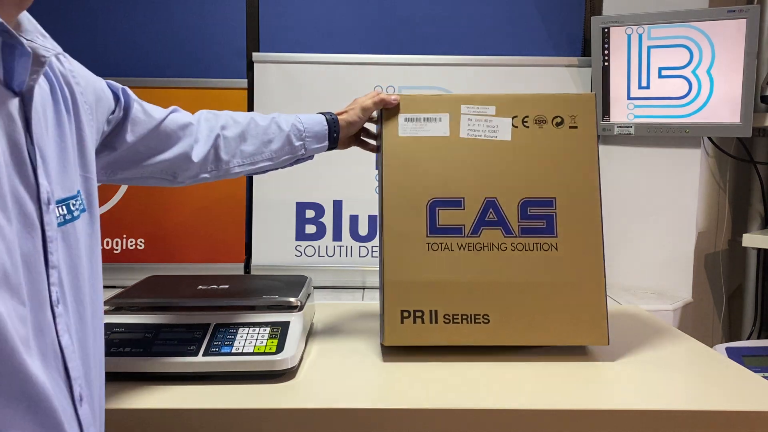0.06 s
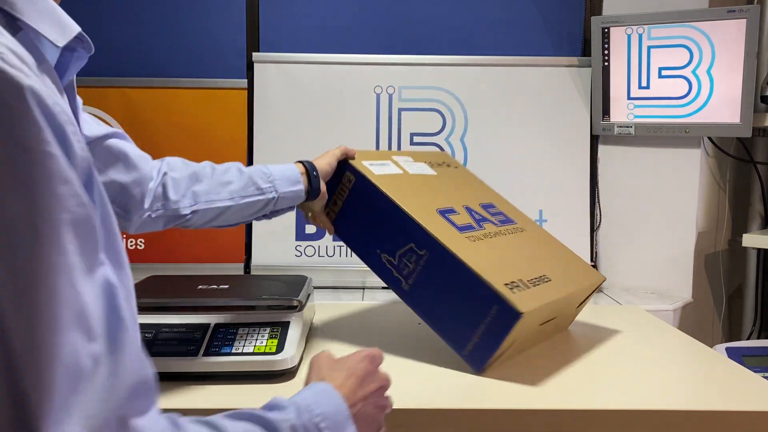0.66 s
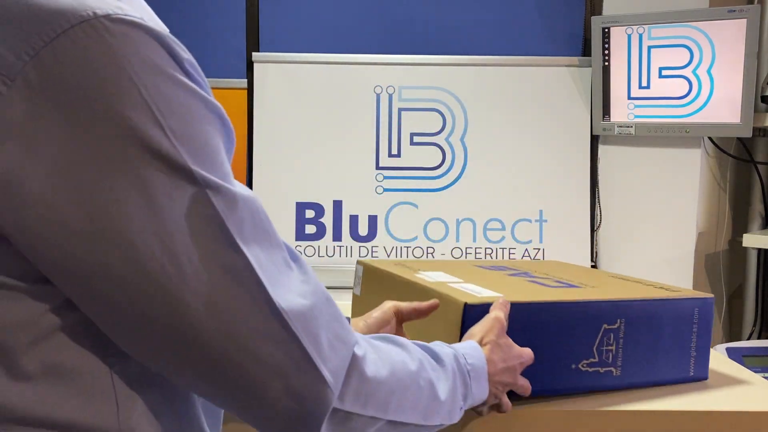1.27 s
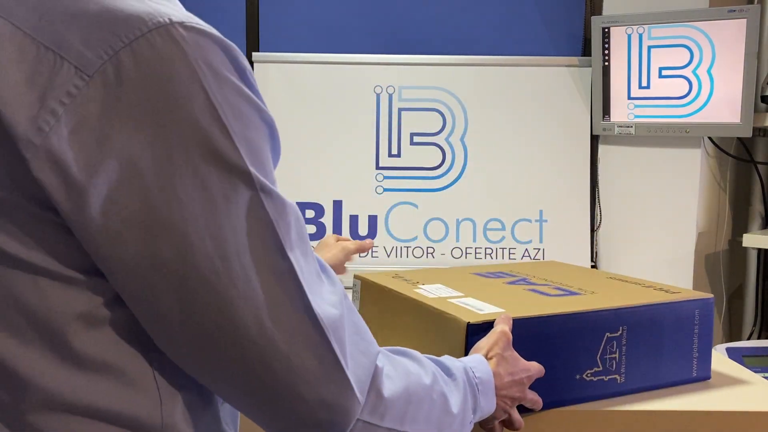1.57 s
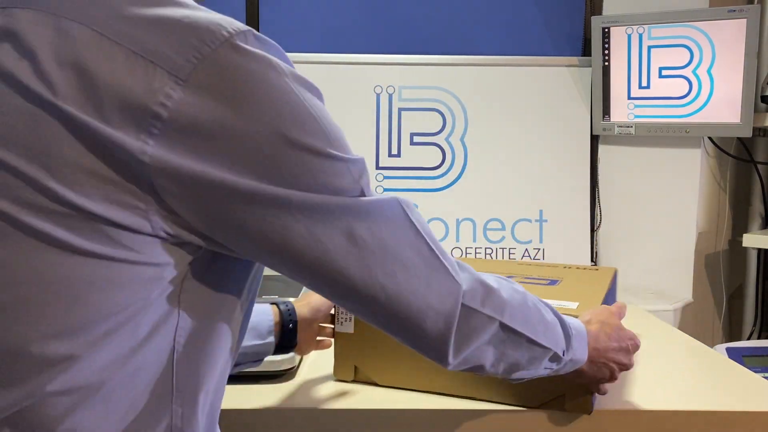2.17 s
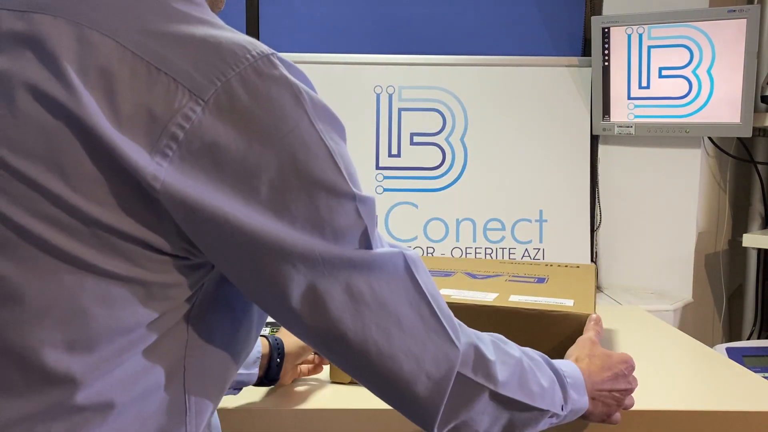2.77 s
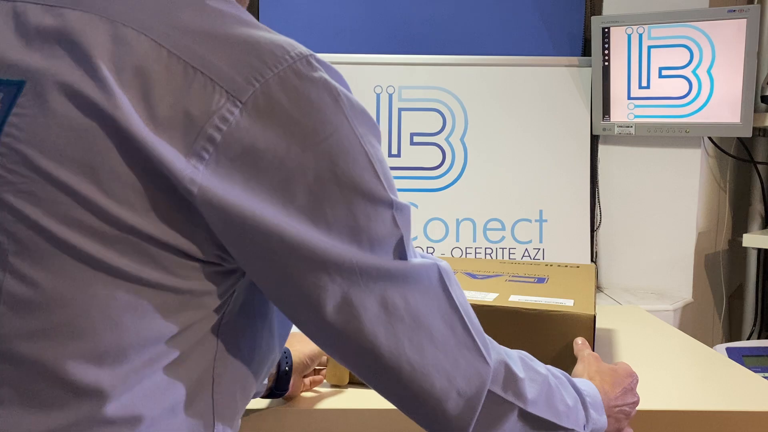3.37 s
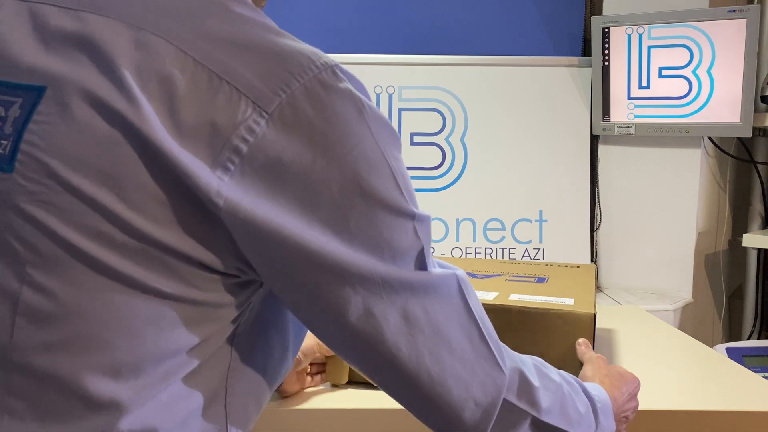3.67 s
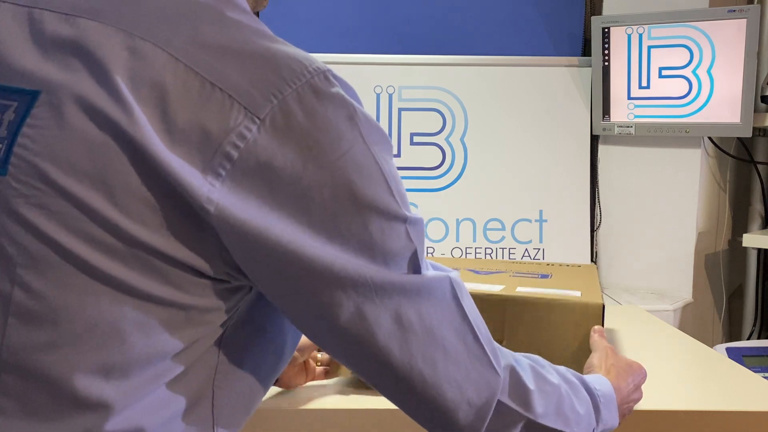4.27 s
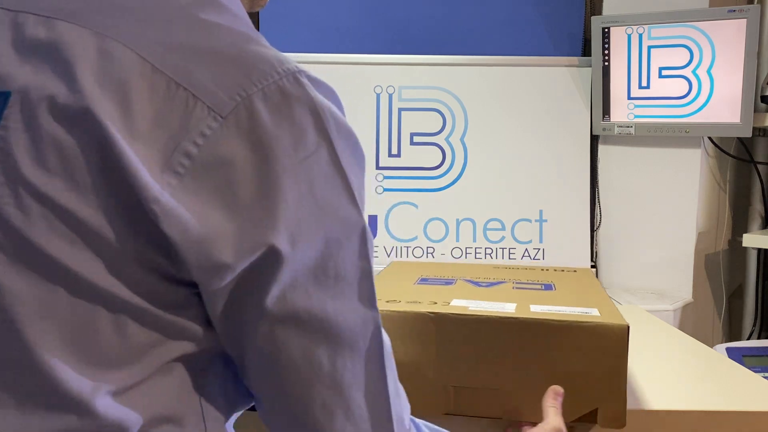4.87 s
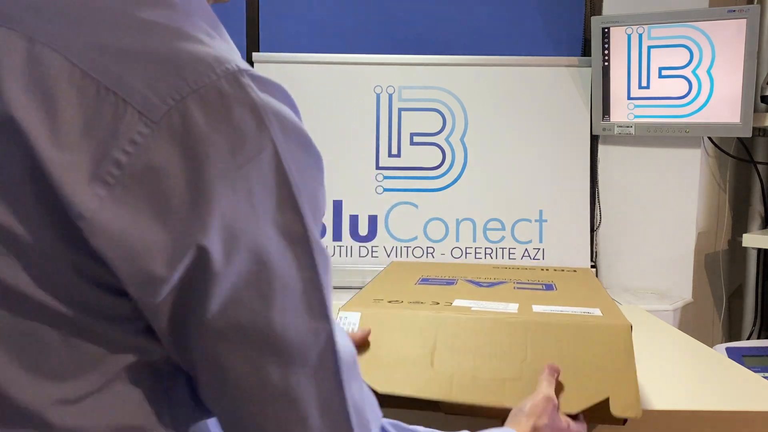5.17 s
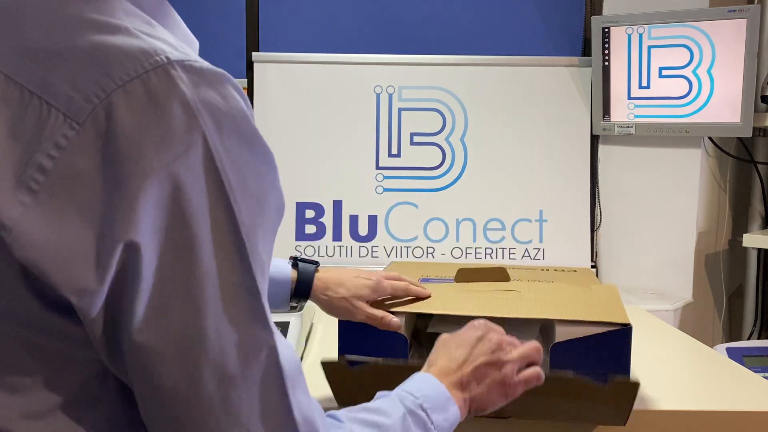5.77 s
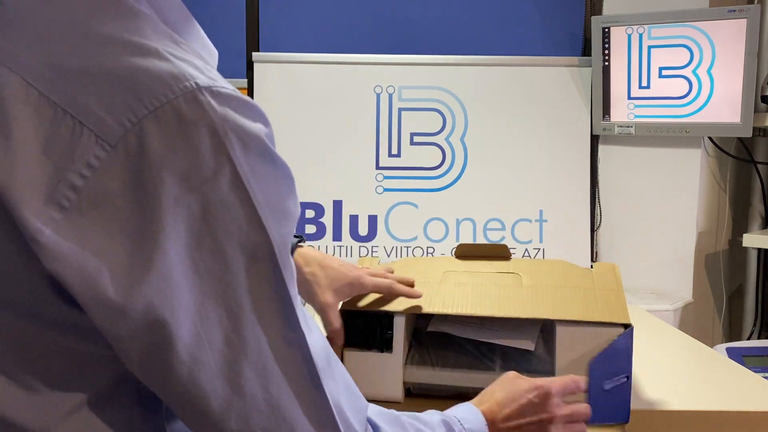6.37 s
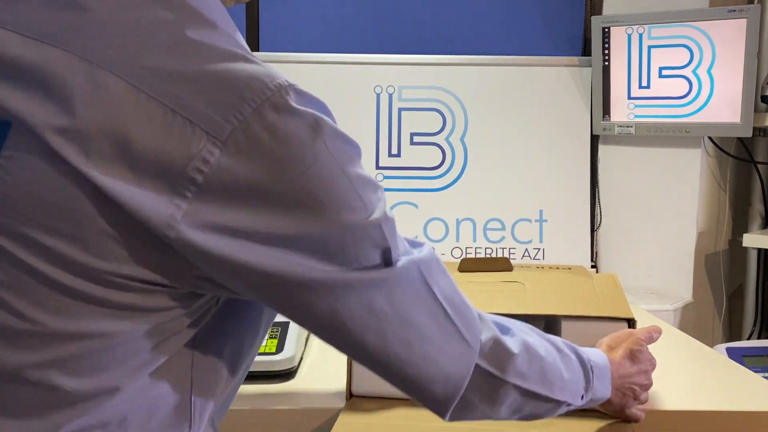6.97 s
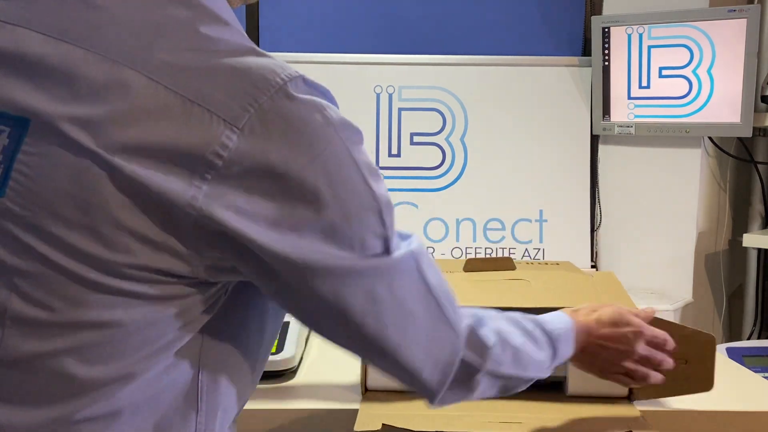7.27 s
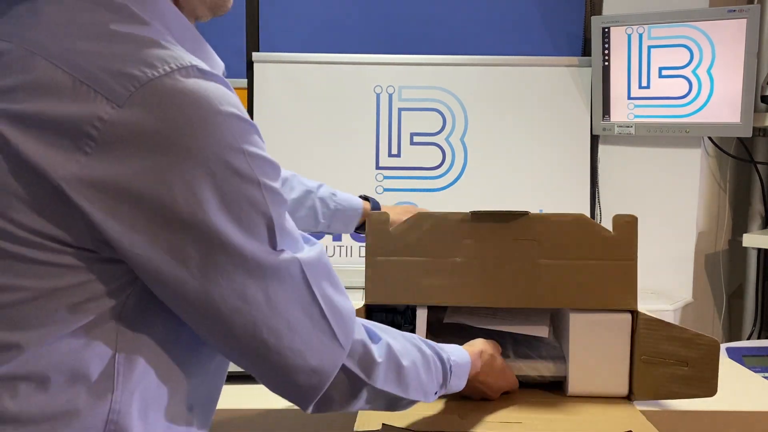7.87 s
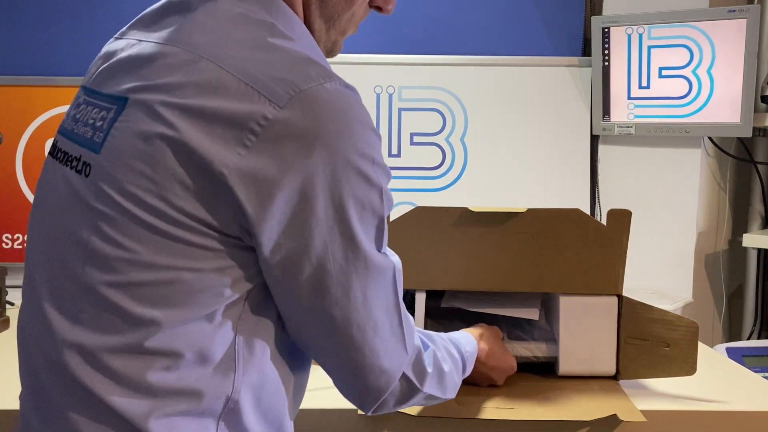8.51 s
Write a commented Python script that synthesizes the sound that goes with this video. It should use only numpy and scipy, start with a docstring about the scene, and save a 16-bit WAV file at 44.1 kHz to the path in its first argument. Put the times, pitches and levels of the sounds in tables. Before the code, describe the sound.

A cardboard box is set down, turned and opened, with hollow thumps, rubbing, crackles and two sharp pops, close by in a small room.

```python
"""A cardboard box is tipped onto a desk, turned and opened, close by in a small office.
Each bump thumps the hollow box, rings its panels and makes the room boom; the flapping lid pushes air.
Card rubs and crackles, two locking tabs scrape and pop free, and a hand reaches into the packing.
Shirt sleeves swish as the arms move, over a faint rumble of ventilation."""
import sys
import numpy as np
from scipy import signal
from scipy.fft import rfft, irfft, next_fast_len
from scipy.io import wavfile
from scipy.ndimage import uniform_filter1d, map_coordinates

SR = 44100
rng = np.random.default_rng(int(sys.argv[2]) if len(sys.argv) > 2 else 0)


def wrap_up_sound(samples):
    """Save the sound to the file named by the first command line argument, as 16-bit audio."""
    columns = np.atleast_2d(samples).T
    # keep every value between -1 and 1, then stretch to whole-number steps
    tamed = np.clip(columns, -1, 1)
    steps = np.round(tamed * 32767).astype(np.int16)
    wavfile.write(sys.argv[1], SR, steps)


N = 376613
TIME = np.arange(N) / SR
AGE = np.arange(SR // 2) / SR  # seconds since a hit, up to half a second

# Tone of the ventilation: (frequency [Hz], level [dB])
VENT_TONE = [(20, 12), (45, 11), (170, -0.5), (330, -0.5), (600, -26), (1150, -17), (1450, -22.5),
             (1800, -23), (5000, -30.5), (16000, -22.5)]
# Arm movements that swish a sleeve: (fastest moment [s], level [dB], rise [s], fall [s])
SLEEVE_STROKES = [(0.29, -44, 0.13, 0.29), (0.68, -47, 0.23, 0.42), (1.33, -61.5, 0.09, 0.57),
                  (2.12, -43, 0.33, 0.38), (3.4, -64.5, 0.24, 0.5), (4.15, -66.5, 0.36, 0.19),
                  (4.45, -59.5, 0.19, 0.065), (4.87, -51, 0.62, 0.19), (5.42, -44.5, 0.28, 0.22),
                  (6.45, -58, 1, 0.71), (7.15, -44, 0.25, 0.17), (7.49, -59, 0.095, .06),
                  (7.65, -49.5, 0.13, 0.15), (7.96, -51, 0.14, 0.18), (8.32, -44.5, 0.28, 0.33)]
# Tone of sliding cloth: (frequency [Hz], level [dB])
SLEEVE_TONE = [(40, -18), (170, 2.5), (450, 2.5), (1200, 0), (2500, -0.5), (5500, -4.5), (8000, -2),
               (11500, -2), (16000, -4.5)]
# Card sliding on the desk or under a hand: (fastest moment [s], level [dB], rise [s], fall [s])
RUB_STROKES = [(0.2, -58, 0.22, 0.43), (0.72, -44.5, 0.4, 0.31), (1.1, -52.5, 0.21, .3),
               (1.87, -47, 0.2, 0.27), (2.85, -56.5, 0.53, 0.21), (3.37, -53, 0.11, 0.15),
               (3.97, -50.5, 0.79, 0.5), (4.76, -45.5, .45, 0.28), (5.42, -48, 0.53, 0.61),
               (6.12, -53.5, 0.33, 0.7), (7.06, -46.5, 0.35, 0.34), (7.68, -49, 0.14, 0.17),
               (8.2, -50.5, 0.13, 0.16), (8.54, -45.5, .16, .15)]
# Tone of rubbing card: (frequency [Hz], level [dB])
RUB_TONE = [(30, -13.5), (70, -2), (165, 3.5), (260, -1), (430, 1.5), (700, -2), (1050, -3.5), (1700, -7.5),
            (4000, -15), (16000, -28)]
# Edges and packing scraping: (start [s], end [s], level [dB], swell [dB], tone centre [Hz])
EDGE_SCRAPES = [(0.12, 0.29, -55.5, 4, 3550), (0.588, 0.856, -50.5, -5, 990),
                (2.649, 2.669, -49.5, 6, 2230), (3.27, 3.343, -42.5, -14.5, 2780),
                (3.592, 3.69, -51.5, -5, 1900), (3.742, 3.784, -28.5, 36.5, 1900),
                (4.13, 4.234, -54, -6.5, 1400), (4.55, 4.599, -50, -12, 655),
                (4.678, 4.993, -54, -19, 2140), (5.083, 5.122, -32.5, 23, 1500),
                (5.108, 5.136, -32.5, -9.5, 4540), (5.25, 5.31, -40, -5, 1060),
                (5.743, 5.81, -46.5, -5, 2600), (6.029, 6.159, -52, 12, 1300),
                (7.581, 7.725, -49, -13.5, 5060), (7.874, 8.037, -59, -13, 6020)]
# Creases giving way: (time [s], level [dB], tone centre [Hz], length of the crackle after it [s])
CREASE_SNAPS = [(0.165, -51, 9070, 0), (0.854, -49, 6930, .02), (1.033, -58, 2960, 0),
                (1.158, -56.5, 7000, 0), (1.393, -39, 6000, 0), (2.376, -55, 7100, 0),
                (2.648, -60, 5040, 0), (2.677, -48, 3580, 0), (2.8, -57.5, 3020, .04),
                (3.125, -42.5, 5050, 0), (3.274, -45.5, 3200, .08), (3.598, -43.5, 3300, .03),
                (3.636, -44.5, 3340, .02), (4.521, -50.5, 10900, 0), (5.115, -38.5, 4500, 0),
                (5.287, -39, 7040, .05), (5.605, -53, 2050, 0), (6.808, -53, 6000, .02),
                (7.085, -51.5, 5040, 0), (7.580, -46.5, 5300, .15), (7.767, -52.5, 6970, .13),
                (7.946, -48, 5940, .03), (8.015, -48.5, 5520, .02), (8.412, -48.5, 7040, 0),
                (8.478, -43.5, 5000, .06)]
# Bumps on the box: (time [s], thump level [dB], panel level [dB], panel pitch [Hz], treble limit [Hz])
BOX_BUMPS = [(1.394, -28, -32, 840, 900), (1.709, -57, -52.5, 397, 586), (2.374, -44.5, -45, 630, 1820),
             (2.566, -52, -64, 397, 500), (2.82, -52.5, -52, 880, 1500), (3.127, -45.5, -40.5, 1570, 2970),
             (3.297, -46, -40.5, 980, 1470), (3.635, -46.5, -40.5, 510, 1210),
             (3.781, -24.5, -24.5, 485, 2290), (4.39, -41.5, -43.5, 413, 1310),
             (4.422, -40, -43.5, 473, 1510), (4.659, -45, -42.5, 990, 1400), (5.116, -19.5, -27, 780, 1600),
             (5.333, -34.5, -41, 426, 800), (5.438, -47, -47, 487, 1090), (5.520, -29.5, -31.5, 437, 920),
             (5.763, -43, -39.5, 560, 1400), (6.107, -36.5, -44, 1000, 900), (6.247, -41, -50, 400, 487),
             (6.484, -50, -51, 430, 710), (7.93, -48, -50, 420, 400)]
# Low notes of a thump, the hollow box's short ones and the room's long boom:
# (pitch [Hz], level [dB], ring time to fade by 60 dB [s])
BOX_AND_ROOM_NOTES = [(65.5, -19, 1), (85.8, -16.5, 0.44), (111.6, -10, 0.48), (151, 1.5, 0.13),
                      (171, -1, 0.21), (165.6, -19, 0.66), (208, -0.5, 0.14), (291.4, -5.5, 0.18)]
# Notes of the box's panels: (pitch [Hz], level [dB], ring time [s])
PANEL_NOTES = [(390, 3, 0.08), (433.2, -2, 0.16), (491, -8, 0.057), (535, -2, 0.066), (655, -9.5, 0.12),
               (743, 1, 0.1), (811, 1, 0.071), (939, 4.5, 0.055), (1090, 1, 0.018), (1240, 8.5, 0.017),
               (1583, -11.5, 0.097), (2036, -31, 0.031), (2560, 5.5, 0.035)]
# Tone of the sharp crack in a bump: (frequency [Hz], level [dB])
CRACK_TONE = [(200, -17), (900, -2), (2800, -3), (4000, -12.5), (7500, -10.5), (11000, -12), (16000, -14)]
# Brief pitched rings of card (tab pops, a squeak, ringing snaps and hollow bumps):
# (time [s], level [dB], pitch [Hz], ring time [s])
CARD_PINGS = [(1.394, -28, 905, 0.072), (2.188, -20, 2040, 0.0072), (2.677, -25, 3480, 0.0029),
              (3.779, 4, 1270, 0.0035), (3.7812, -11.5, 486, 0.024), (5.117, -9, 1210, 0.0055),
              (5.606, -27, 2360, 0.0036), (7.937, -43.5, 438, 0.06)]
# Broad panels and flaps pushing air: (time [s], level [dB])
FLAP_WAFTS = [(1.398, -37), (4.449, -35.5), (5.123, -41), (5.335, -31.5), (5.37, -35.5)]
# Notes of the bending flaps: (pitch [Hz], level [dB], ring time [s])
FLAP_NOTES = [(67.5, 3, 0.21), (84.2, -2, 0.24), (109.6, -7, 0.11)]
# How long the office rings: (frequency [Hz], ring time [s])
ROOM_RING = [(60, 1), (200, 0.35), (600, 0.27), (2500, 0.43), (7000, 0.42), (16000, 0.23)]
# Strength of the room's echoes: (frequency [Hz], level [dB])
ECHO_TONE = [(60, -14.5), (200, -5), (450, 1), (900, -2), (16000, -1)]
# Stereo width of the echoes; "side" is how the two channels differ: (frequency [Hz], side level [dB])
ECHO_WIDTH = [(60, -9), (250, -7.5), (600, -2.5), (1500, -1.5), (5800, -3.5), (7000, -15.5), (16000, -17)]
# Stereo width of rustle and ventilation: (frequency [Hz], side level [dB])
RUSTLE_WIDTH = [(60, -15.5), (250, -13), (700, -6), (1500, -4.5), (3000, -9.5), (5800, -2), (7000, -49),
                (16000, -17.5)]
# Left microphone turned up and right one down by this much: (frequency [Hz], level [dB])
LEFT_LEAN = [(60, 0), (700, 0), (2000, 0.3), (5000, 1.5), (7000, -0.5)]


def amp(db):
    """Turn decibels into a multiplier."""
    return 10 ** (np.asarray(db) / 20)


def unit(x):
    """Scale to an average (rms) level of 1."""
    return x / np.sqrt(np.mean(x ** 2) + 1e-20)


def burst(x):
    """Give a hit the energy of 40 ms of sound at level 1."""
    return x * np.sqrt(.04 * SR / np.sum(x ** 2))


def along(points, hz):
    """Read between a table's rows, on a log frequency scale."""
    freqs, values = np.transpose(points)
    return np.interp(np.log(hz + 1), np.log(freqs + 1), values)


def filtered(x, response):
    """Multiply each frequency in x by response(hz)."""
    size = x.shape[-1]
    padded = next_fast_len(size + 8192)
    return irfft(rfft(x, padded) * response(np.fft.rfftfreq(padded, 1 / SR)), padded)[..., :size]


def noise(tone, size):
    """Noise shaped by a tone table, at level 1."""
    return unit(filtered(rng.standard_normal(size), lambda hz: amp(along(tone, hz))))


def resonate(x, centre_hz, damping):
    """Keep a band around centre_hz; more damping makes it wider."""
    width_hz = damping * centre_hz
    return filtered(x, lambda hz: 1j * hz * width_hz / (centre_hz ** 2 - hz ** 2 + 1j * hz * width_hz))


def dull(x, cut_hz):
    """Soft card passes little above cut_hz."""
    return filtered(x, lambda hz: 1 / (1 + 1j * np.sqrt(2) * hz / cut_hz - (hz / cut_hz) ** 2))


def wobble(rate):
    """A smooth curve through rate random points a second."""
    return map_coordinates(rng.standard_normal(int(N * rate / SR) + 4), [TIME * rate])


def add(track, s, sound):
    """Mix a sound into the track, s seconds in."""
    part = track[round(s * SR):][:len(sound)]
    part += sound[:len(part)]


def spread(mid, side):
    """Blend two unrelated sounds into one wide stereo sound."""
    side = filtered(side, lambda hz: amp(along(RUSTLE_WIDTH, hz)))
    return np.array([mid + side, mid - side])


def ventilation():
    """Ventilation fills the office with a faint, steady rumble and hiss."""
    return amp(-62.0) * spread(noise(VENT_TONE, N), noise(VENT_TONE, N))


def strokes(rows, edge_db=19, flatness=2.13):
    """Loudness of strokes: each gains edge_db over its rise and loses it again over its fall."""
    power = np.zeros(N)
    for s, db, rise_s, fall_s in rows:
        away = np.abs(TIME - s) / np.where(TIME < s, rise_s, fall_s)
        near = away < 2
        power[near] += amp(db - edge_db * away[near] ** flatness) ** 2
    return np.sqrt(power)


def shifting(x, depth_db):
    """Touching spots and echoes move, so the tone keeps changing."""
    bands = signal.stft(x, nperseg=1024)[2]
    drift = uniform_filter1d(rng.standard_normal(bands.shape), size=7, axis=0)  # smooth over frequency
    drift = uniform_filter1d(drift, size=9, axis=1)  # and over time
    return unit(signal.istft(bands * amp(depth_db * unit(drift)), nperseg=1024)[1][:N])


def sleeves():
    """Cloth slides in a fine, fluttering hiss with each arm movement."""
    weave = amp(0.99 * wobble(45) + 0.82 * wobble(700))
    cloth = [shifting(noise(SLEEVE_TONE, N) * weave, depth_db=1.94) for _ in range(2)]
    return spread(*cloth) * strokes(SLEEVE_STROKES) * amp(2.5)


def slips(size, rate, spread_db):
    """Card sticks and slips, making about rate tiny, uneven clicks a second."""
    chance, strength = rng.random(size), rng.standard_normal(size)
    return (chance < rate / SR) * rng.choice([-1, 1], size) * amp(spread_db * np.clip(strength, -2, 2))


def rubbing():
    """Sliding card makes a low, grainy rub as its fibres catch under changing pressure."""
    pressure = amp(1.2 * wobble(25))
    fibres = []
    for _ in range(2):
        grain = filtered(slips(N, rate=3500, spread_db=4), lambda hz: amp(along(RUB_TONE, hz)))
        fibres.append(shifting(grain, depth_db=4.0))
    return spread(*fibres) * strokes(RUB_STROKES) * pressure


def scraping():
    """Edges catch and slip in quick runs that ease in and out."""
    out = np.zeros(N)
    for start, end, db, swell_db, centre_hz in EDGE_SCRAPES:
        size = max(round((end - start) * SR), SR // 200)
        force = amp(swell_db * np.linspace(0, 1, size)) * signal.windows.tukey(size, .3)
        run = resonate(slips(size, rate=3000, spread_db=5.5) * force, centre_hz, damping=0.85)
        add(out, start, amp(db) * unit(dull(run, cut_hz=6.3 * centre_hz)))
    return out


def snap_run(length_s, count=14, gap_s=0.013, later_db=-6.5, scatter_db=3):
    """One snap, then weaker ones at uneven gaps for length_s."""
    gaps = gap_s * (1 + .5 * rng.uniform(-1.1, 1, count))
    delays = np.append(0, np.cumsum(gaps))
    levels = np.append(0, later_db + scatter_db * rng.standard_normal(count))
    age = AGE[:SR // 20]
    shape = amp(-60 * age / 0.014) * (1 - np.exp(-age / 0.00037))
    snaps = rng.standard_normal((len(delays), len(age))) * shape
    run = np.zeros(len(AGE))
    for delay, db, snap in zip(delays, levels, snaps):
        if delay <= length_s:
            add(run, delay, amp(db) * burst(snap))
    return run


def crackle():
    """Creases give way in snaps a few milliseconds long."""
    out = np.zeros(N)
    for s, db, centre_hz, length_s in CREASE_SNAPS:
        run = snap_run(length_s)
        add(out, s, amp(db) * np.std(run) * unit(resonate(run, centre_hz, damping=4.6)))
    return out


def ring(notes, scatter_db, detune):
    """Fading notes whose strength and pitch shift with the grip and the spot that is hit."""
    hz, db, ring_s = np.transpose(notes)[:, :, None]
    strength, shift = rng.standard_normal((2, len(notes), 1))
    build_up = 1 - np.exp(-2 * hz * AGE)  # takes about half a cycle
    swing = np.cos(2 * np.pi * hz * (1 + detune * shift) * AGE) * build_up
    return burst(np.sum(amp(db + scatter_db * strength - 60 * AGE / ring_s) * swing, 0))


def knocks():
    """Each bump makes the box and room boom and rings the panels; soft bumps are slow and dull."""
    out = np.zeros(N)
    for s, thump_db, panel_db, struck_hz, treble_hz in BOX_BUMPS:
        press = 1 - np.exp(-AGE * treble_hz / 2.0)
        rattle = rng.standard_normal(len(AGE)) * amp(-60 * AGE / .06)
        rattle = burst(resonate(rattle, centre_hz=710, damping=1.9))
        panels = burst(dull(ring(PANEL_NOTES, scatter_db=4.0, detune=0.012) + 1.36 * rattle, treble_hz))
        struck_panel = burst(np.sin(2 * np.pi * struck_hz * AGE) * amp(-60 * AGE / 0.017))
        knock = burst(press * (panels + 0.82 * struck_panel))
        thump = ring(BOX_AND_ROOM_NOTES, scatter_db=3.5, detune=0.014)
        crack = burst(noise(CRACK_TONE, len(AGE)) * amp(-60 * AGE / 0.047) * press)
        crack_db = panel_db - 11 + 5.5 * np.log2(treble_hz / 1200)  # harder bumps crack more
        add(out, s, amp(thump_db) * thump + amp(panel_db) * knock + amp(crack_db) * crack)
    return out


def pings():
    """Card rings briefly at one pitch in a tab pop, a squeak, a snap or a hollow bump."""
    out = np.zeros(N)
    onset = 1 - np.exp(-AGE / 0.00079)
    for s, db, hz, ring_s in CARD_PINGS:
        add(out, s, 2 * onset * amp(db - 60 * AGE / ring_s) * np.sin(2 * np.pi * hz * AGE))
    return out


def flaps():
    """Broad flaps and panels bend and push air in a deep, soft thud."""
    out = np.zeros(N)
    for s, db in FLAP_WAFTS:
        add(out, s, amp(db) * ring(FLAP_NOTES, scatter_db=7.5, detune=0.033))
    return out


def echoes(tail_db, early_db):
    """The room's answer to a click, as mid and side: desk and near walls first, then a fading tail."""
    hz, t, bands = signal.stft(rng.standard_normal((2, len(AGE))), SR, nperseg=256)
    fade = amp(-60 * t / along(ROOM_RING, hz)[:, None])
    tail = signal.istft(bands * fade, SR, nperseg=256)[1][:, :len(AGE)]
    tail *= 1 - np.exp(-AGE / 0.0069)
    early = rng.standard_normal((2, len(AGE))) * amp(-60 * AGE / 0.06) * (1 - np.exp(-AGE / 0.001))
    answer = amp(tail_db) * tail / np.linalg.norm(tail[0])
    answer += amp(early_db) * early / np.linalg.norm(early[0])
    return filtered(answer, lambda f: amp(along(ECHO_TONE, f) + np.outer([0, 1], along(ECHO_WIDTH, f))))


def office(x, tail_db, early_db):
    """The box and the body move about, so every half second has its own echoes."""
    mid, side = np.zeros((2, N))
    for start in range(0, N, len(AGE)):
        answer = signal.fftconvolve(x[None, start:start + len(AGE)], echoes(tail_db, early_db), axes=1)
        add(mid, start / SR, answer[0])
        add(side, start / SR, answer[1])
    return np.array([x + mid + side, x + mid - side])


def scene():
    """All the handling sounds in the office, over its quiet ventilation."""
    box = office(knocks() + flaps(), tail_db=-4.0, early_db=-7.5)
    card = office(crackle() + pings() + scraping(), tail_db=-6.0, early_db=-5.0)
    rustle = (sleeves() + rubbing()) * amp([[.3], [-.3]])  # a touch to the left
    return box + card + rustle + ventilation()


def record(dry):
    """A phone cuts deep rumble and the very top, and widens the treble by delaying it on the left."""
    rumble_hz, widen_hz, top_hz, lag_s = 46, 6720, 15900, .000225
    delay = lambda hz: np.exp(-2j * np.pi * lag_s * np.outer([1, 0], np.maximum(hz - widen_hz, 0)))
    lean = lambda hz: amp(np.outer([1, -1], along(LEFT_LEAN, hz)))
    dry = signal.sosfilt(signal.butter(3, rumble_hz, "highpass", fs=SR, output="sos"), dry)
    return filtered(dry, lambda hz: delay(hz) * lean(hz) * (hz < top_hz))


dry = scene()
out = record(dry)
wrap_up_sound(out)
```